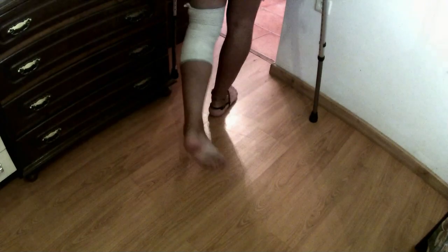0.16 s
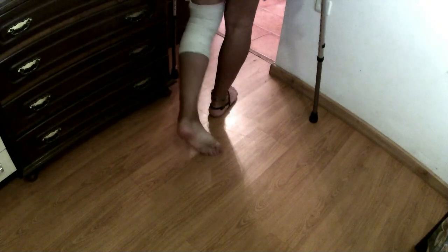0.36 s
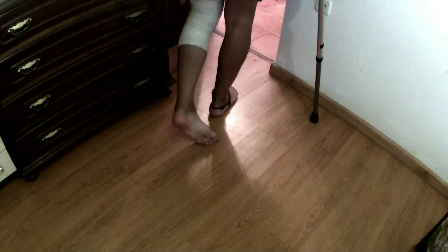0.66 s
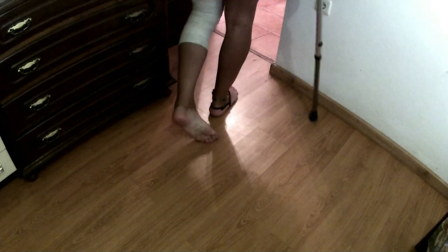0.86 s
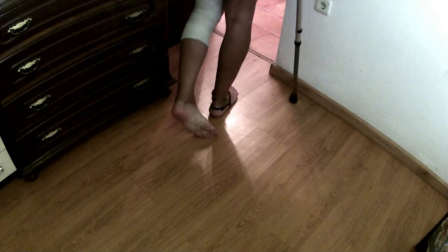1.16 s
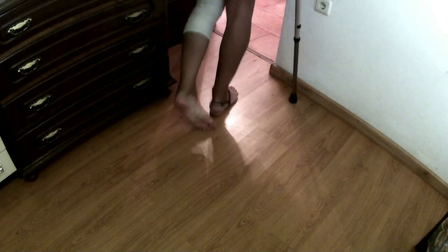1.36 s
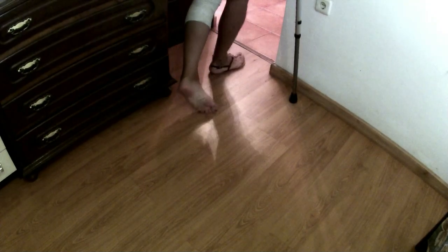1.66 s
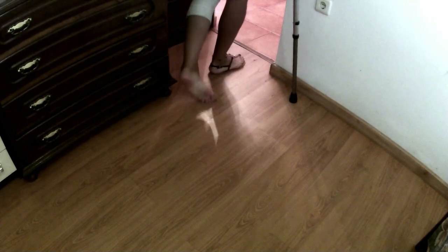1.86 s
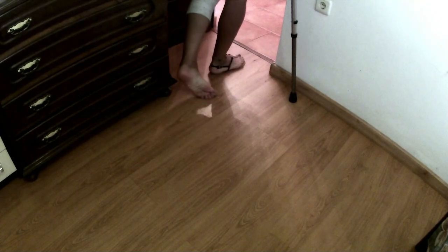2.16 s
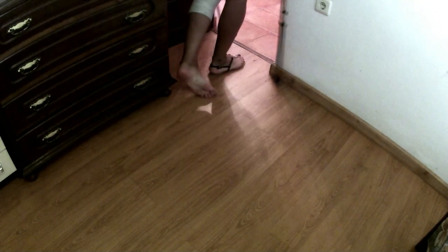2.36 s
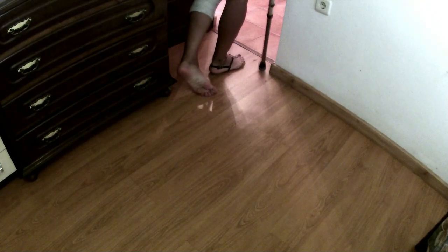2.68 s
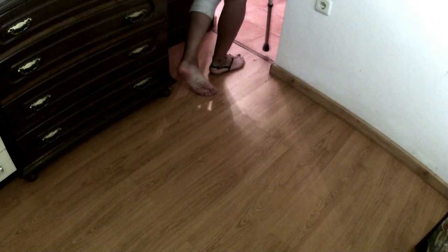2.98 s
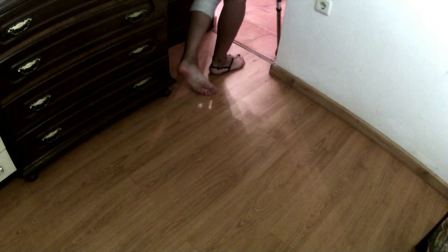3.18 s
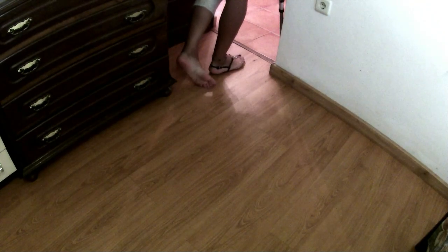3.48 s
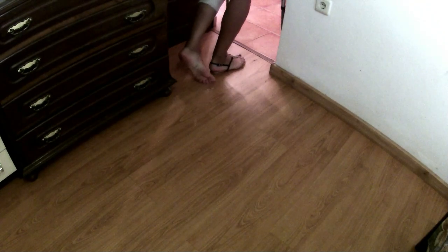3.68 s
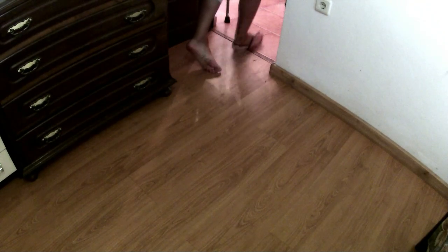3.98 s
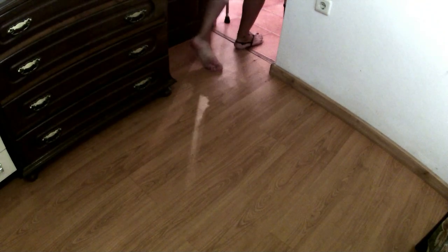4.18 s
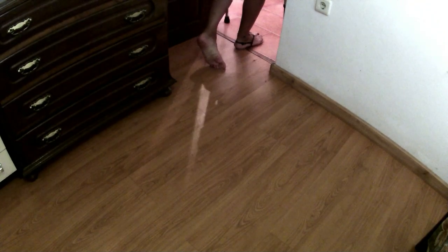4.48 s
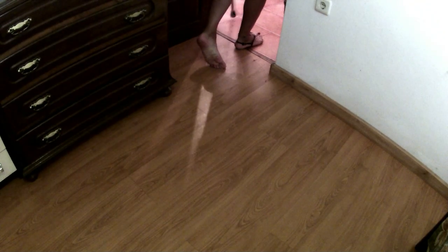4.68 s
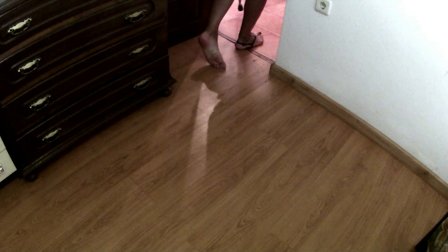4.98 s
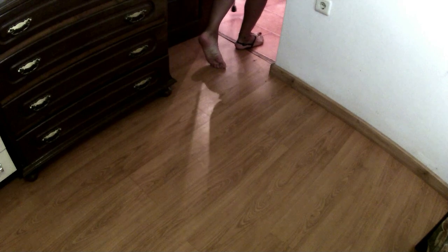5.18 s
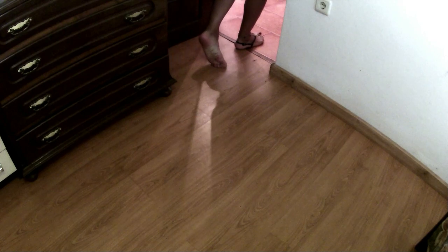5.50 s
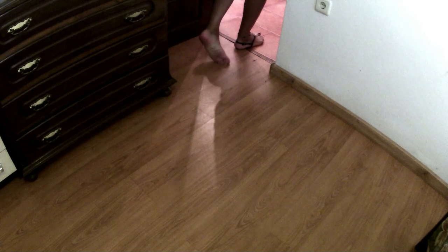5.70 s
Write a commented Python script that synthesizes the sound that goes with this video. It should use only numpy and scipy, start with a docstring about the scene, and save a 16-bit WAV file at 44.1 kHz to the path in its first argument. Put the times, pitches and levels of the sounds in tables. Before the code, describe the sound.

Someone hops slowly on metal crutches across a hard indoor floor, with a heavy thud, flip-flop slaps, scuffs and light metallic clicks.

```python
"""On a laminate floor beside a tiled room, someone hops on metal crutches, one foot in a flip-flop.
The crutches click as they take and lose the load: filtered impacts excite the modes of a tube.
The sandal's slaps, squeak and pops are filtered impacts; its scuffs and drags are stick-slip noise.
Landings ring decaying modes of the boards, and decaying noise stands for the hard-walled room.
Beneath lies a steady hiss, nearly mono."""
import sys
import numpy as np
from scipy import signal
from scipy.fft import rfft, irfft, next_fast_len
from scipy.io import wavfile
from scipy.ndimage import uniform_filter1d, map_coordinates

SR = 44100
rng = np.random.default_rng(int(sys.argv[2]) if len(sys.argv) > 2 else 0)


def waveform_to_disk(signal):
    """Save audio, clipped to [-1, 1], as 16-bit WAV at the path in sys.argv[1]."""
    frames = np.transpose(np.atleast_2d(signal))
    scaled = np.clip(frames, -1, 1) * 32767
    samples = np.round(scaled).astype(np.int16)
    wavfile.write(sys.argv[1], SR, samples)


N = 257544
T = np.arange(SR) / SR  # the life of one sound, s

# spectrum of a sole rubbing on the floor: f/Hz, relative level/dB
RUB_SPECTRUM = [(60, -18), (250, -20.5), (480, -6), (750, -4), (1100, -9), (1900, -7), (2800, -4),
                (3600, 0), (4500, -5.5), (5900, -10.5), (7000, -22.5), (12000, -46)]


def amp(db):
    """Decibel law: level to amplitude ratio."""
    return 10 ** (np.asarray(db) / 20)


def unit(x):
    """Normalisation to an rms of 1."""
    return x / np.sqrt(np.mean(x ** 2) + 1e-20)


def along(points, hz):
    """Interpolation of (f/Hz, value) points on a logarithmic frequency axis."""
    f, v = np.transpose(points)
    return np.interp(np.log(hz + 1), np.log(f + 1), v)


def add(track, s, x):
    """Superposition: mix x into the track at time s, cut at both ends of the track."""
    start = round(s * SR)
    x = x[max(-start, 0):]
    part = track[max(start, 0):][:len(x)]
    part += x[:len(part)]


def coloured(x, gain):
    """Minimum-phase filtering: a folded cepstrum makes the given gain over frequency causal."""
    m = 2 * next_fast_len(len(x) // 2 + SR // 10)
    log_gain = np.log(np.maximum(gain(np.fft.rfftfreq(m, 1 / SR)), 1e-6))
    cepstrum = irfft(log_gain)
    cepstrum[1:m // 2] *= 2
    cepstrum[m // 2 + 1:] = 0
    response = np.exp(rfft(cepstrum))
    return irfft(rfft(x, m) * response, m)[:len(x)]


def resonance(f, hz, width):
    """Resonance: gain of one steep-sided peak, half its height at half a width from the centre."""
    return 1 / (1 + (2 * (f - hz) / width) ** 2)


def touch(hz, knock_db, middle_db, bright_db):
    """Contact stiffness: place and hardness of a contact weight the bands around 3 kHz."""
    weights = [(650, knock_db), (1050, middle_db), (1800, middle_db),
               (2900, 0), (3900, 0), (5700, bright_db)]
    return amp(along(weights, hz))


def room(near_db=3, near_t60=0.21):
    """Reverberation: a fresh response of energy 1, dense near walls and then a longer tail."""
    # reverberation time of the tail: f/Hz, t60/s
    tail_t60 = [(80, 1.0), (200, 0.58), (500, 0.59), (1500, 0.6), (3500, 0.55), (7000, 0.55), (14000, 0.13)]
    hz, t, z = signal.stft(rng.standard_normal(SR), SR, nperseg=256)
    decay = amp(-60 * t / along(tail_t60, hz)[:, None])
    tail = signal.istft(z * decay, SR, nperseg=256)[1][:SR]
    walls = amp(near_db - 60 * T / near_t60) * rng.standard_normal(SR)
    response = (tail + walls) * (1 - np.exp(-T / 0.0044))  # build-up time constant in s
    return response / np.linalg.norm(response)


def blow(room_db, snap=0.43, chatter_length=0.0051):
    """Impact excitation: a one-sample snap, milliseconds of chatter and the room's answer."""
    chatter = rng.standard_normal(SR) * np.exp(-(T / chatter_length) ** 2)
    chatter = chatter / np.linalg.norm(chatter)
    return snap * (T == 0) + chatter + amp(room_db) * room()


def clack(f, ping_hz, ping_db, ping_width_hz=750):
    """Local resonance: in a hard contact, the part that snaps stands out at its own pitch."""
    # spectrum of a hard contact: f/Hz, relative level/dB
    contact = [(60, -27), (250, -13), (450, -1.5), (650, -3), (1000, -11), (1600, -6.5), (2300, -4.5),
               (3000, -1), (3600, -1), (4400, -7), (6000, -15), (6900, -26.5), (9000, -34.5), (14000, -54)]
    ping = amp(along(contact, ping_hz) + ping_db) * resonance(f, ping_hz, ping_width_hz)
    return np.hypot(amp(along(contact, f)), ping)


def tube(f, ring_db):
    """Modal superposition: the aluminium tube's resonances add in power."""
    # modes of the aluminium tube: f/Hz, width/Hz, relative level/dB
    modes = [(554, 204, -1.5), (1012, 39, -1.5), (1510, 160, -2), (2126, 410, 3), (2320, 48, -6),
             (2662, 150, 6), (2960, 110, -5), (5440, 300, -24.5)]
    return np.sqrt(sum((amp(level + ring_db) * resonance(f, hz, width)) ** 2
                       for hz, width, level in modes))


def crutches(ping_db=6.5, ping_width_hz=550, middle_db=1, gain_db=25):
    """Impact on a resonator: each tap knocks the floor, clacks and rings the tube."""
    # a crutch takes or loses the load: t/s, relative level/dB, knock of the tip/dB, bright/dB,
    # tube ring/dB, ping f/Hz, room/dB
    taps = [(1.278, -38, -8, -8, -8, 2460, 4.5), (1.3667, -30.5, -12, 6, -8.5, 2900, 1.5),
            (2.656, -35, -24, 4.5, -8, 2250, 0), (3.127, -44.5, -5.5, 9, -8, 3360, 8),
            (4.003, -32, -3, -6, 2, 2420, 1.5), (5.094, -31.5, 4, 3.5, 4.5, 2170, 0),
            (5.128, -36.5, -14, 0, 5.5, 2200, 0), (5.335, -33, 5.5, 1, -3.5, 1440, 5),
            (5.383, -39.5, -4, 6, -4, 3300, 5)]
    out = np.zeros(N)
    for s, db, knock_db, bright_db, ring_db, ping_hz, room_db in taps:
        def body(f):
            metal = np.hypot(clack(f, ping_hz, ping_db, ping_width_hz), tube(f, ring_db))
            return metal * touch(f, knock_db, middle_db, bright_db)
        add(out, s, amp(db + gain_db) * coloured(blow(room_db), body))
    return out


def pins(ping_db=8, ring_db=-12, room_db=0, gain_db=25):
    """Impact of a light part: thin bright ticks barely stir the tube."""
    # the height pin shifts in its hole: t/s, relative level/dB, ping f/Hz
    ticks = [(1.283, -33, 5950), (1.5634, -40, 3700), (2.145, -51, 3360), (2.388, -35.5, 5660),
             (4.756, -46.5, 5700), (5.758, -48.5, 4940)]
    out = np.zeros(N)
    for s, db, ping_hz in ticks:
        def body(f):
            metal = np.hypot(clack(f, ping_hz, ping_db), tube(f, ring_db))
            return metal * touch(f, knock_db=-6, middle_db=-8, bright_db=6)
        tick = coloured(blow(room_db, snap=0.6, chatter_length=0.0038), body)
        add(out, s, amp(db + gain_db) * tick)
    return out


def slaps(ping_db=4, knock_db=-4, room_db=4.0, gain_db=25):
    """Extended contact: the more of the rubber sole meets at once, the fuller the body."""
    # the sandal slaps the heel or the floor: t/s, relative level/dB, body/dB, bright/dB, ping f/Hz
    claps = [(0.3244, -20, -3, -1, 3430), (1.727, -39.5, 0.5, 7, 3360), (1.788, -33, -4.5, 4.5, 4470),
             (3.916, -33.5, -6.5, 1, 3200), (4.068, -38, 1, 4, 3020), (4.206, -41.5, 13.5, 10, 3420),
             (4.227, -31, 1, 1.5, 2020), (4.243, -32, 4, 7.5, 3950)]
    out = np.zeros(N)
    for s, db, body_db, bright_db, ping_hz in claps:
        def body(f):
            return clack(f, ping_hz, ping_db) * touch(f, body_db + knock_db, body_db, bright_db)
        add(out, s, amp(db + gain_db) * coloured(blow(room_db), body))
    return out


def squeak(start_s=1.7026, pitch_hz=2870, width_hz=650, db=-20.5, room_db=-3, gain_db=25):
    """Filtered impact: as rubber catches on the laminate, a short burst in one narrow band."""
    out = np.zeros(N)
    burst = blow(room_db, chatter_length=0.012)
    cry = coloured(burst, lambda f: resonance(f, pitch_hz, width_hz))
    add(out, start_s, amp(db + gain_db) * cry)
    return out


def pops(width_hz=310, room_db=3, gain_db=33):
    """Cavity resonance: the gap under the sole gives a hollow note as it closes."""
    # air squeezed out under the sandal: t/s, relative level/dB, f/Hz
    puffs = [(.246, -37.5, 500), (1.80, -45.5, 480), (1.851, -40, 480), (3.916, -31, 670),
             (3.941, -39, 685)]
    out = np.zeros(N)
    for s, db, hz in puffs:
        note = coloured(blow(room_db), lambda f: resonance(f, hz, width_hz))
        add(out, s, amp(db + gain_db) * note)
    return out


def grains(count, rough):
    """Stick-slip friction: noise whose strength varies over about a millisecond."""
    jumps = unit(uniform_filter1d(rng.standard_normal(count), size=45))
    return unit(rng.standard_normal(count) * np.exp(rough * jumps))


def stroke(length, attack, release):
    """Exponential relaxation: the envelope of one rub, with attack, hold and release in s."""
    return (1 - np.exp(-T / attack)) * np.exp(-np.maximum(T - length, 0) / release)


def scuffs(edge=0.0014, knock_db=-4, room_db=0, gain_db=6, grit=0.5):
    """Stick-slip friction: short gritty strokes of the sandal start and stop quickly."""
    # the sole scuffs the floor: t/s, length/s, relative level/dB, body/dB, bright/dB
    strokes = [(0.106, 0.0099, -39.5, -11, -4), (0.114, 0.021, -28.5, -11.5, -11),
               (0.2, 0.013, -40, -1, 3.5), (0.241, 0.013, -33, 3, -5.5), (1.697, 0.02, -33.5, -11.5, -5),
               (1.799, 0.061, -45.5, 4, 3), (1.849, 0.025, -37, 1.5, -8), (4.025, 0.065, -46, 2.5, -2),
               (4.248, 0.03, -43, 4, -17)]
    out = np.zeros(N)
    for s, length, db, body_db, bright_db in strokes:
        def body(f):
            return amp(along(RUB_SPECTRUM, f)) * touch(f, body_db + knock_db, body_db, bright_db)
        rub = stroke(length, edge, edge) * grains(SR, rough=grit)
        rub = rub + amp(room_db) * signal.fftconvolve(rub, room())[:SR]
        add(out, s, amp(db + gain_db) * coloured(rub, body))
    return out


def drags(room_db=1, gain_db=3):
    """Friction over a closing cavity: faint hiss above a hollow note that sinks under the sole."""
    # cloth and sole drag lightly: t/s, length/s, relative level/dB, hollow/dB, fading/(dB per s)
    rubs = [(-0.05, 0.33, -48, 4.5, 4), (0.329, 0.46, -47, 3, 31), (1.482, 0.24, -52, -2, -8),
            (1.93, 0.22, -53, -3, 8), (3.381, 0.83, -54, -1.5, 6.5), (4.199, 0.38, -53.5, 4.5, 21),
            (5.45, 0.4, -68.5, 3, -4)]
    open_hz, shut_hz, width_hz = 840, 575, 490  # the hollow note as the foot comes down
    rise_share, release_s = 0.1, 0.044  # a longer drag swells more slowly
    waver_db, waver_per_s = 1.5, 12  # uneven pressure on the sole

    def rub_gain(f):
        return amp(along(RUB_SPECTRUM, f)) * touch(f, knock_db=-15, middle_db=-0.5, bright_db=1.0)

    out = np.zeros(N)
    for s, length, db, hollow_db, fade_db_per_s in rubs:
        hiss = coloured(grains(SR, rough=0.31), rub_gain)
        gap_open = coloured(grains(SR, rough=0.43), lambda f: resonance(f, open_hz, width_hz))
        gap_shut = coloured(grains(SR, rough=0.43), lambda f: resonance(f, shut_hz, width_hz))
        # an equal-power crossfade carries the note down
        shut = np.clip(T / length, 0, 1)
        hollow = np.sqrt(1 - shut) * gap_open + np.sqrt(shut) * gap_shut
        waver = waver_db * map_coordinates(rng.standard_normal(64), [T * waver_per_s])
        pressure_db = waver - fade_db_per_s * T
        level = amp(db + gain_db + pressure_db) * stroke(length, rise_share * length, release_s)
        add(out, s, level * (hiss + amp(hollow_db) * hollow))
    return out + amp(room_db) * signal.fftconvolve(out, room())[:N]


def landings(rise=0.0041, thud_db=33, waver=0.17):
    """Modal excitation: a soft heavy blow rings the boards and fills the room with a thud."""
    # weight landing on the boards: t/s, relative ring/dB, relative thud/dB, deep/dB, hard/dB
    falls = [(.327, -45.5, -18.5, 6, 2), (.364, -42.5, -20.5, 2, -10), (1.28, -64.5, -42, 1, 3),
             (4.019, -64, -50.5, 17.5, -17), (4.338, -33, -25, -18.5, 4), (5.094, -63, -43, 14, 0),
             (5.347, -56, -35, 3.5, 4)]
    # modes of floor and room: f/Hz, relative level/dB, t60/s
    modes = [(87.9, -11, 0.83), (118, -17, 0.28), (166.6, -8.5, 0.34), (182.9, 2, 0.36), (222.3, -10, 0.71),
             (299, -2, 0.61), (378, -11, 0.06), (432, -11.5, 0.63), (496, 4, 0.033), (494, -2.5, 0.42),
             (742, -13, 0.26)]
    # spectrum of the thud: f/Hz, relative level/dB
    thud_spectrum = [(30, -38), (50, -30), (68, -6.5), (115, -6.5), (170, 2), (330, -0.5), (520, -5.5),
                     (800, -13.5), (1500, -17.5), (3000, -21), (6000, -31), (12000, -74)]
    # the band of the floor's sag: foot, top, top, foot, each f/Hz
    deep_band = (58, 80, 110, 160)

    def mode(hz, level, t60):
        envelope = amp(level + rng.normal(0, 1) - 60 * T / t60)
        # close room modes blur each ring's phase
        drift = waver * map_coordinates(rng.standard_normal(44), [T * 40])
        phase = rng.random() * 2 * np.pi + drift
        return envelope * np.sin(2 * np.pi * hz * T + phase)

    out = np.zeros(N)
    for s, ring_db, db, deep_db, hard_db in falls:
        ring = sum(mode(*row) for row in modes) * (1 - np.exp(-T / rise))
        thud = coloured(room(near_db=1.0, near_t60=0.39), lambda f: amp(along(thud_spectrum, f)))
        boom = amp(ring_db) * ring + amp(db + thud_db) * thud
        sag = zip(deep_band, (min(deep_db, 0), deep_db, deep_db, 0))
        weight = [*sag, (300, 0), (500, hard_db)]
        add(out, s, coloured(boom, lambda f: amp(along(weight, f))))
    return out


def background(quiet_db=-59):
    """Stationary noise: still room and hiss, whose channels part mainly in the treble."""
    # noise spectrum: f/Hz, relative density level/dB
    quiet = [(15, -34), (25, -8), (260, -1), (399, -3.5), (567, -4.5), (631, -3.5), (741, -6), (1450, -7.5),
             (1950, -9), (2770, -10), (3340, -10), (3930, -12), (4870, -13), (7300, -16.5), (15500, -21)]
    # difference between the channels: f/Hz, side-to-mid level/dB
    apart = [(60, -25), (110, -35), (200, -29.5), (380, -25), (700, -20.5), (1290, -24.5), (2380, -45),
             (4400, -23), (8120, -5), (15000, -4.5)]

    def still():
        noise = coloured(rng.standard_normal(N), lambda f: amp(along(quiet, f)))
        return amp(quiet_db) * unit(noise)

    mid = still()
    side = coloured(still(), lambda f: amp(along(apart, f)))
    return np.array([mid + side, mid - side])


def scene():
    """Superposition: all steps reach both channels alike, over the background."""
    metal = crutches() + pins()
    sandal = slaps() + squeak() + pops() + scuffs() + drags()
    return metal + sandal + landings() + background()


def record(dry, top_hz=15400):
    """Band limitation: nothing passes at or above the top frequency."""
    m = next_fast_len(N + SR // 2)
    passed = np.fft.rfftfreq(m, 1 / SR) < top_hz
    return irfft(rfft(dry, m) * passed, m)[:, :N]


dry = scene()
out = record(dry)
waveform_to_disk(out)
```